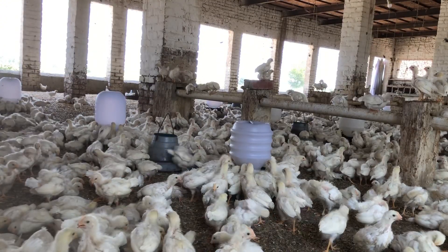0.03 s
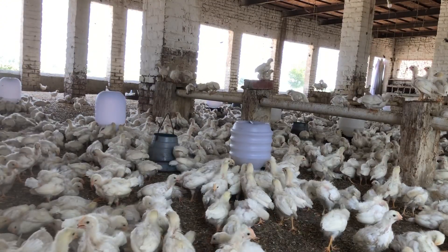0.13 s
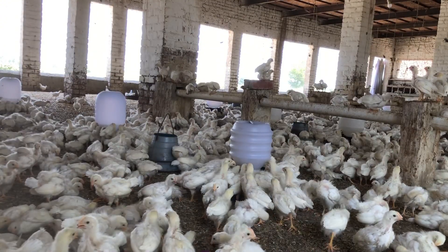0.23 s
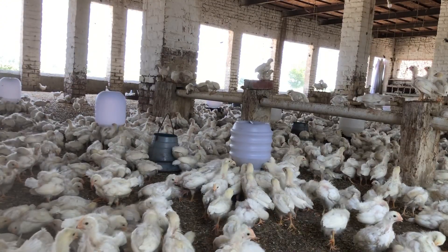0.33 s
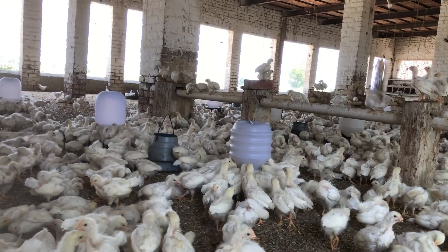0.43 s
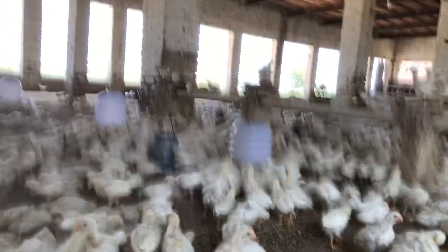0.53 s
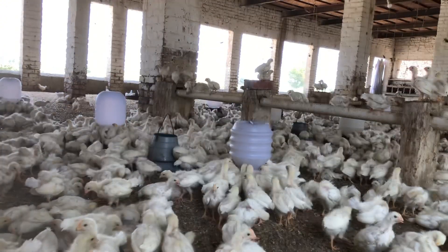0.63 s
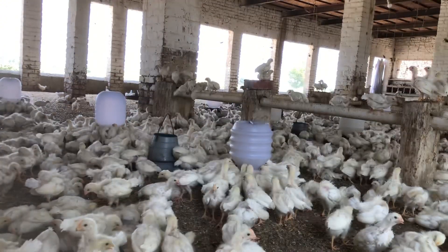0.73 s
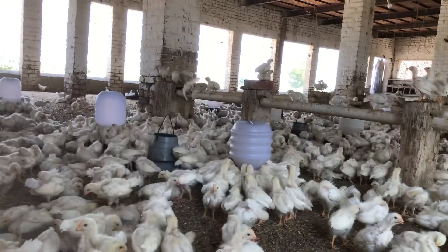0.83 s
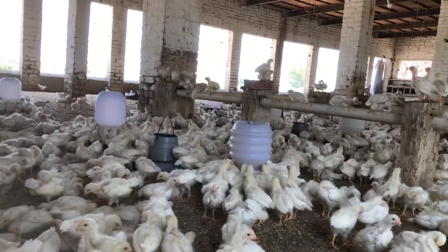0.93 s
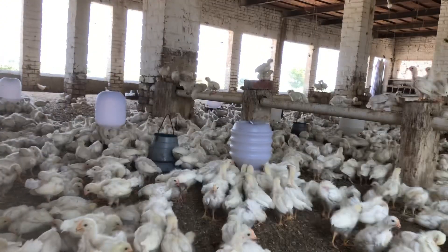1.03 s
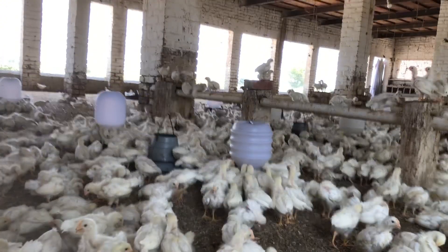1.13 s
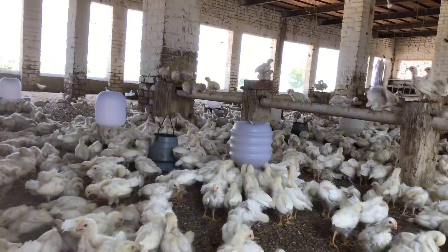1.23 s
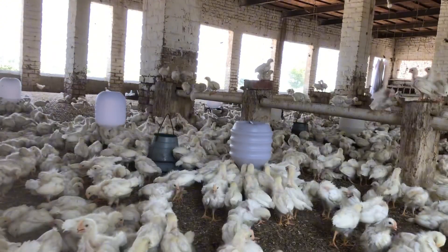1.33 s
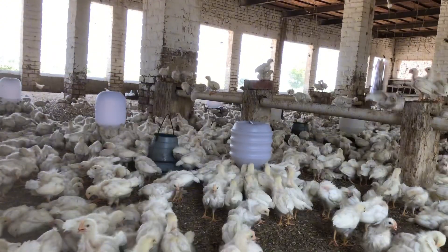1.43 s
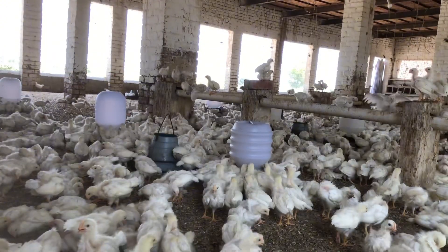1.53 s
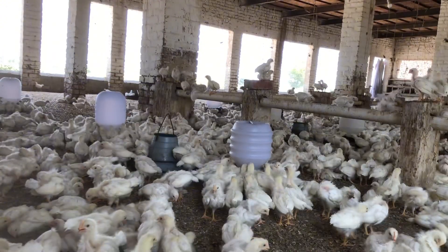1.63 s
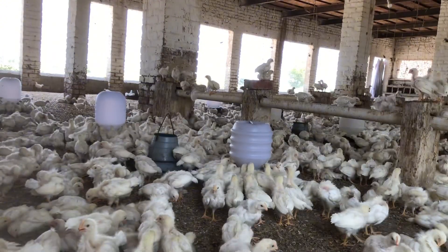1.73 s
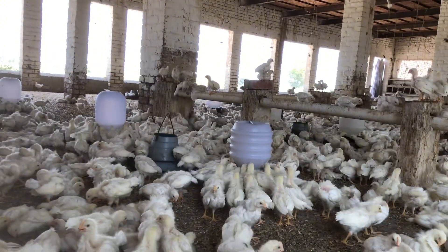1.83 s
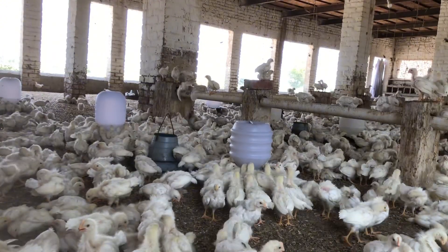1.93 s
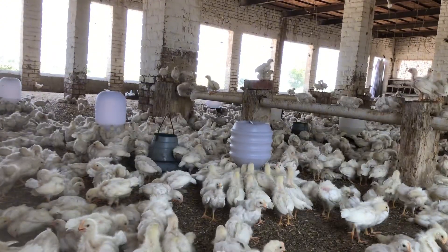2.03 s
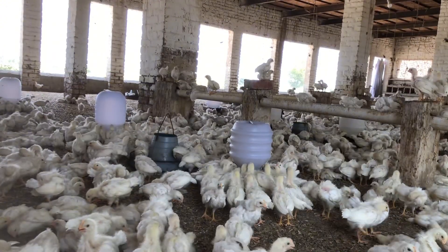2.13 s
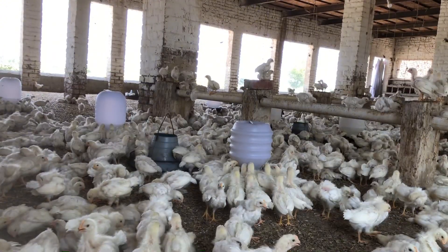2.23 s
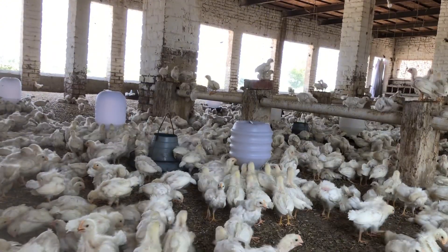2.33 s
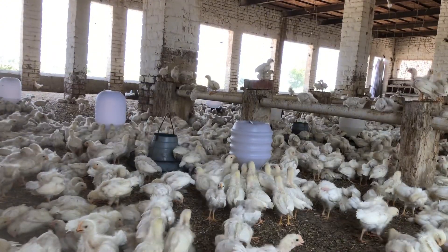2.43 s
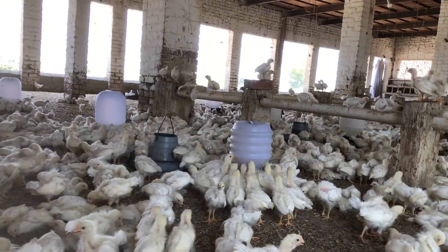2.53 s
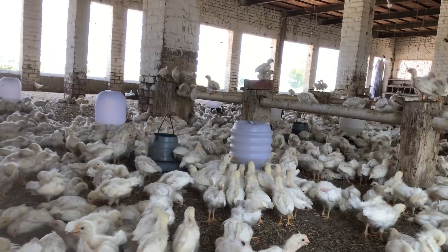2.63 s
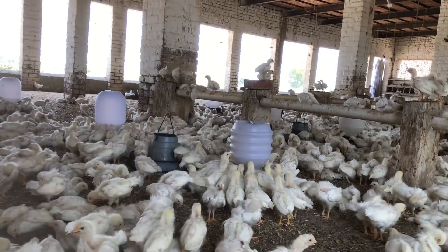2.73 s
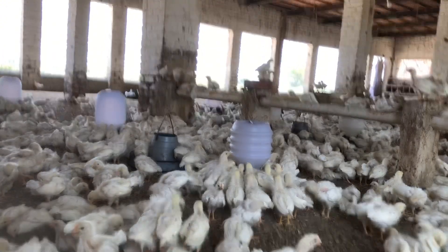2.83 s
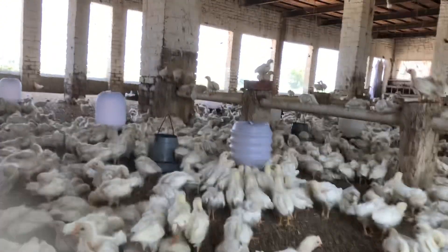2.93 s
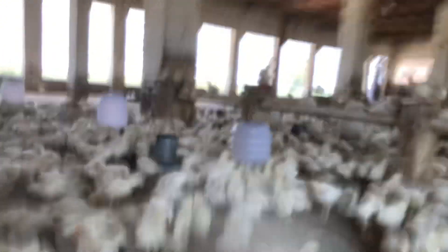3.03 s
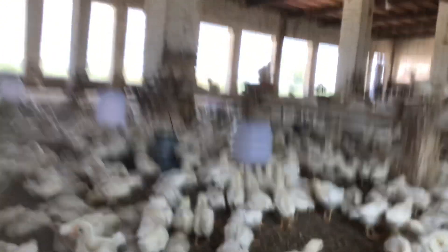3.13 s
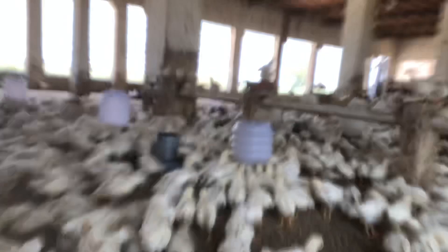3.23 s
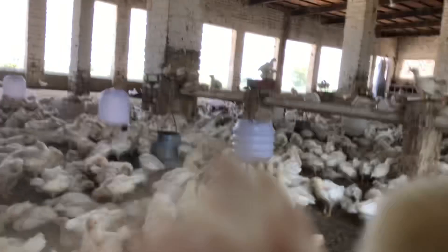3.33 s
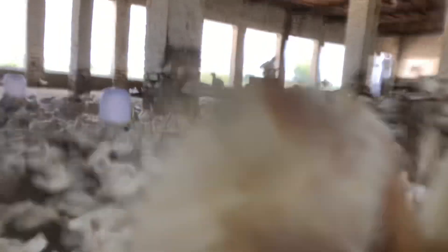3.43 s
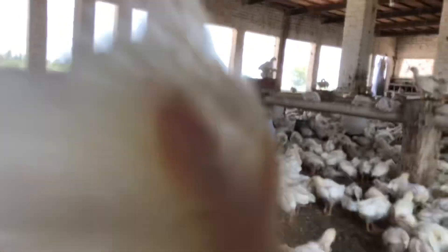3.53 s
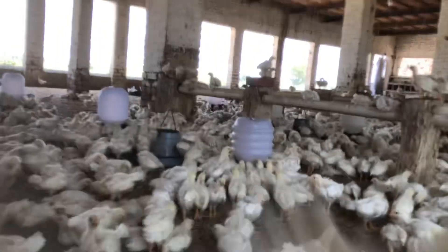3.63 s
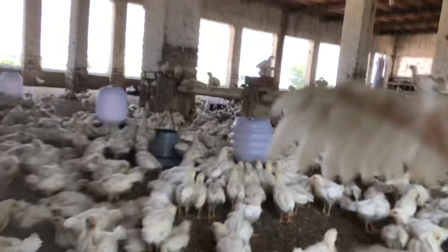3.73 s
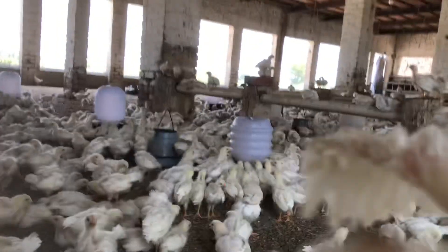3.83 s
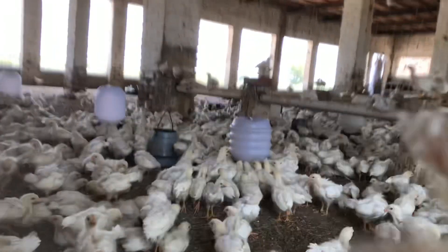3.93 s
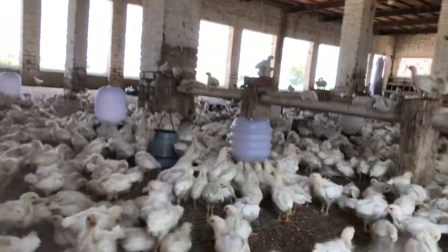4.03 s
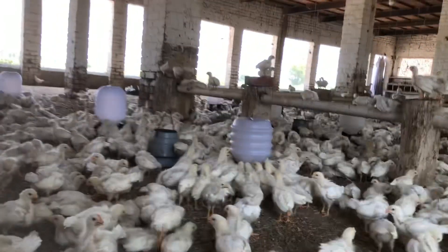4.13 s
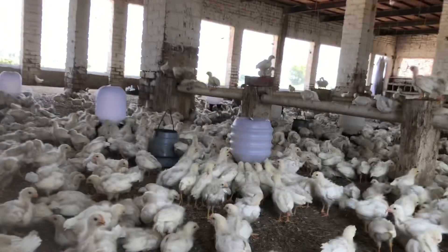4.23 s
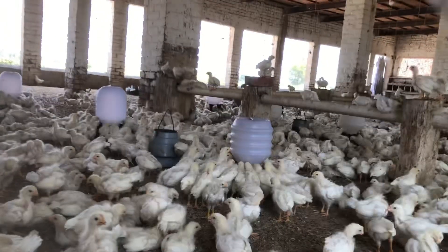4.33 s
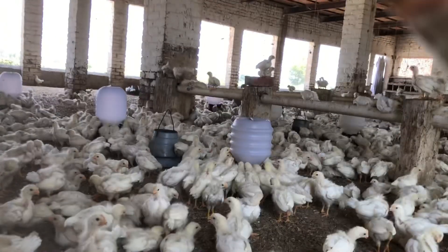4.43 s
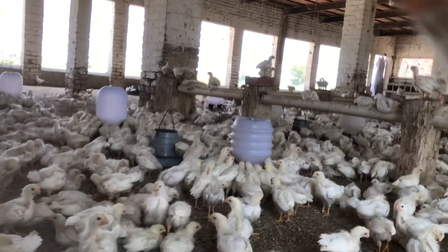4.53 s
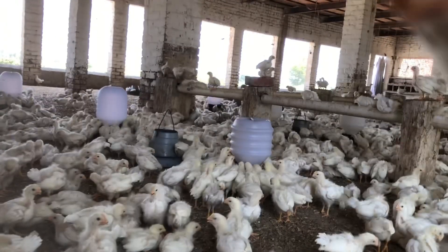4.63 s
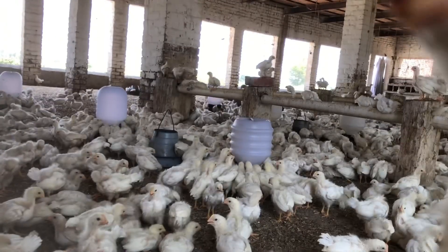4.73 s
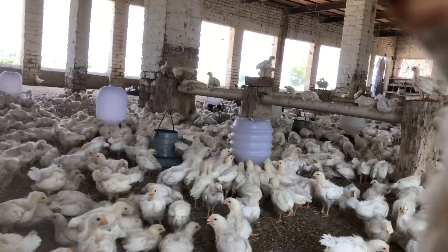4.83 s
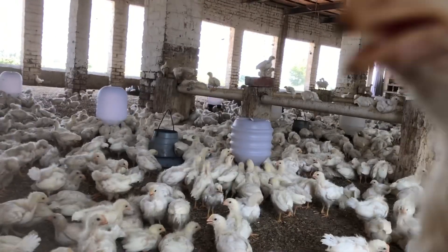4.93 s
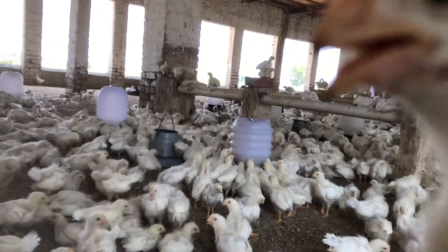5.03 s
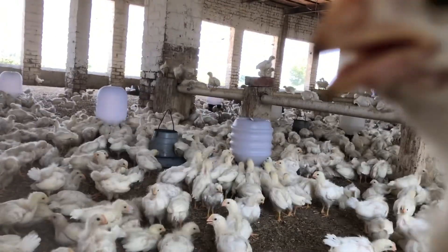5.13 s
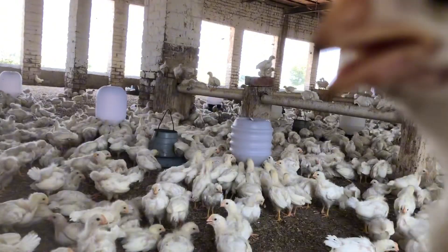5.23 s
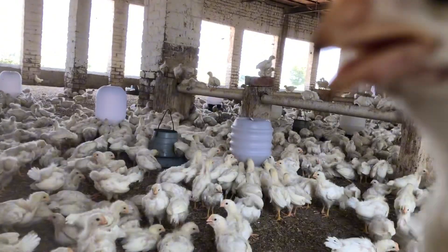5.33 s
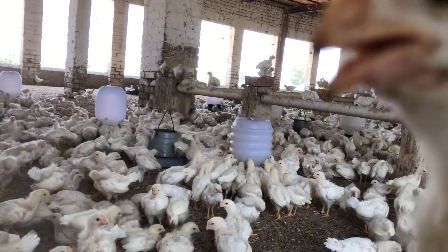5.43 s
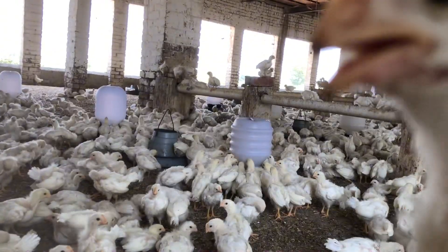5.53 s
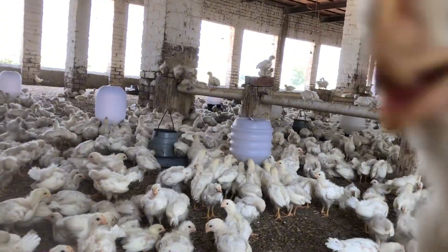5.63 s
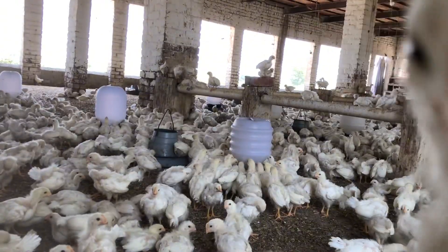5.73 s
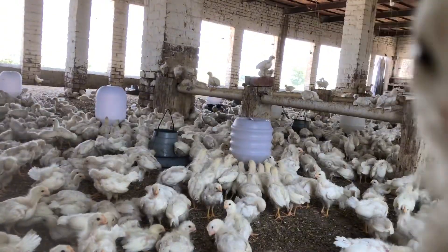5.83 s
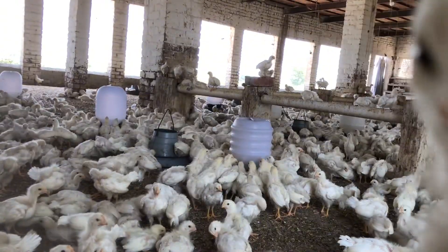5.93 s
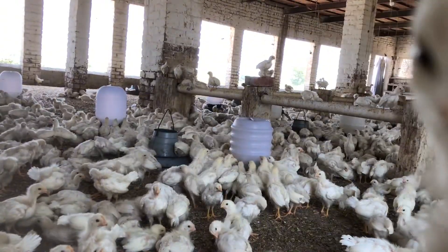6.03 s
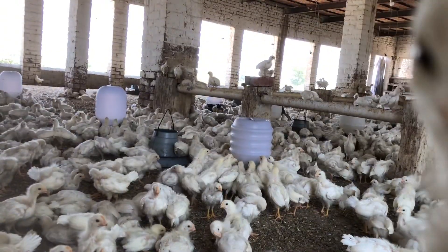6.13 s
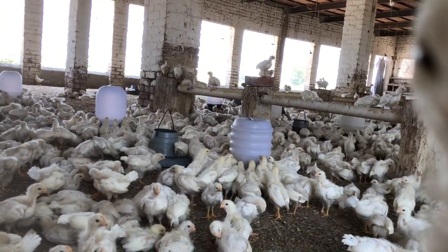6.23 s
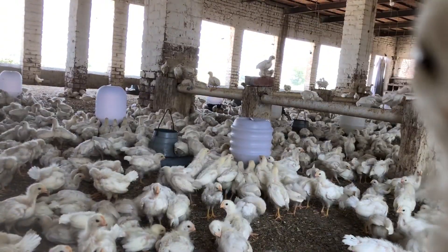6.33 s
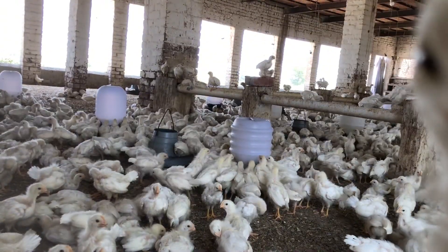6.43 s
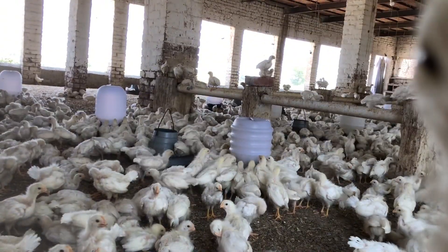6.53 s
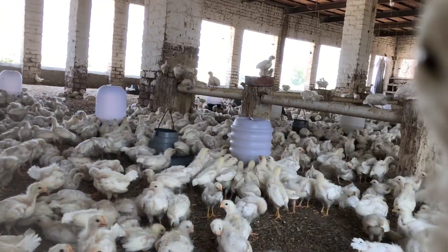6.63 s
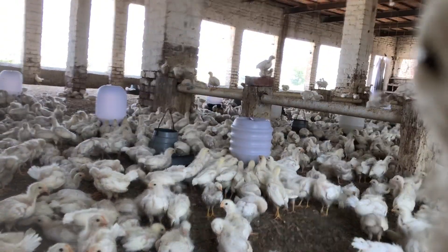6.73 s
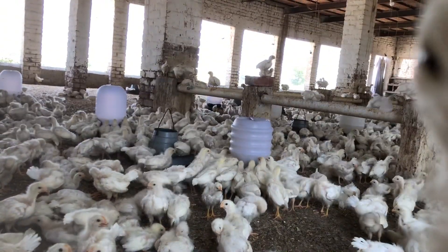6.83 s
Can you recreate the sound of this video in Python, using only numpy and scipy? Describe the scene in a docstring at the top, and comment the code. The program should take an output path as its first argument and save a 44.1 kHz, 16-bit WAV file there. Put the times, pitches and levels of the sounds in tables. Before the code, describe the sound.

Hundreds of young chickens peep steadily in an open brick shed over a soft murmur and faint motor hum. Small scuffs tick on the pole holding the microphone and a soft low coo sounds. Around three seconds a bird flaps up very close: heavy thumps, wing puffs, feather swishes and scrabbling claws until about four and a half seconds. Then quieter peeps, light taps and hoarse breathy calls.

```python
"""A flock of young chickens peeps and trills (gliding whistles) in an open shed, with its murmur (noise),
a faint far motor (steady tones) and breeze. Claws shuffle, scuff and knock on the pole that carries the
microphone; each knock travels along it as a falling bending wave. A soft low coo (sine) sounds before one
bird flaps up onto the pole; hoarse calls (breath noise) come before and after. Feathers brush the port
(grainy noise), wing beats buffet it, claws and beak scrabble, and a sliding foot makes the pole sing."""
import sys
import numpy as np
from scipy import signal
from scipy.fft import irfft
from scipy.io import wavfile

SR = 44100
rng = np.random.default_rng(int(sys.argv[2]) if len(sys.argv) > 2 else 0)


def transcribe(u):
    """Save the signal u as a 16-bit wav file named by the first command-line argument.

    u: samples, shape (n,) or (channels, n), limited to [-1, 1]; the rate is SR.
    q: integer samples, one column per channel.
    """
    v = np.clip(np.atleast_2d(u).T, -1, 1)
    q = np.round(v * 32767).astype(np.int16)
    wavfile.write(sys.argv[1], SR, q)


N = 304290

# ways the pole can ring: (pitch [Hz], relative level [dB], time to die by 60 dB when left free [s])
POLE_MODES = [(318, -0.5, 0.028), (492.4, 9, 0.032), (553, -1.5, 0.06), (675, 9.5, 0.0086),
              (995, -0.5, 0.032), (1705, 6, 0.0097)]
# how hard the bird works on the pole, as the level of its shuffling claws: (time [s], level [dB])
CLAW_WORK = [(0, -65.5), (2.82, -71.5), (2.95, -47), (3.2, -37), (3.39, -54.5), (3.58, -35.5),
             (3.72, -49.5), (4.12, -43.5), (4.36, -57.5), (4.563, -40.5), (4.66, -69), (5.1, -58.5),
             (6.45, -74), (6.9, -50.5)]


def from_db(db):
    """Gain of a level in dB."""
    return 10 ** (np.asarray(db) / 20)


def rms_one(x):
    """Scale to rms 1, a common loudness."""
    return x / np.sqrt(np.mean(x ** 2) + 1e-20)


def in_time(rows):
    """Columns of a curve table after its time column, one value per sample."""
    s, *columns = np.transpose(rows)
    return [np.interp(np.arange(N) / SR, s, column) for column in columns]


def add(track, s, sound):
    """Mix a short sound in at time s."""
    i = max(round(s * SR), 0)
    track[i:i + len(sound)] += sound[:N - i]


def drift(rate):
    """Slow random wandering of spread 1; a higher rate in Hz wanders faster."""
    r = np.exp(-80 * np.pi * rate / SR)   # worked out at every 40th sample only
    noise = rng.standard_normal(N // 40 + 2002)
    slow = signal.lfilter([1], [1, -2 * r, r * r], noise)[2000:]
    return np.interp(np.arange(N) / 40, np.arange(len(slow)), rms_one(slow))


def burst_db(s, hold_s, peak_db, rise_db_per_s, fall_db_per_s):
    """Level in dB that climbs to a peak at s, holds and falls away."""
    t = np.arange(N) / SR
    before, after = np.maximum(s - t, 0), np.maximum(t - s - hold_s, 0)
    return np.maximum(peak_db - rise_db_per_s * before - fall_db_per_s * after, -200)


def resonate(x, hz, width_hz):
    """One resonance, applied twice; gain 1 on top."""
    r = np.exp(-np.pi * width_hz / SR)
    section = [(1 - r * r) / 2, 0, (r * r - 1) / 2, 1, -2 * r * np.cos(2 * np.pi * hz / SR), r * r]
    return signal.sosfilt([section, section], x)


def banded_noise(spectrum, patchy_db):
    """Half-octave bands of noise, each with its own level and flicker; rms 1."""
    out, together, edges = 0, drift(2.3), 22 * 2 ** np.arange(0, 9.6, .5)
    white = rng.standard_normal((2, N))   # neighbouring bands take turns with two noises
    hz, db = np.transpose(spectrum)
    for k, (low, high) in enumerate(zip(edges, edges[1:])):
        level_db = np.interp(np.log(low * high) / 2, np.log(hz), db, -200, -200)
        if level_db > -150:   # bands outside the table stay silent
            band_filter = signal.butter(2, [low, high], "band", fs=SR, output="sos")
            band = signal.sosfilt(band_filter, white[k % 2])
            flicker_db = patchy_db * (0.15 * together + drift(29.0))
            out = out + from_db(level_db + flicker_db) * band
    return rms_one(out)


def shed_echo(x):
    """A dying noise tail stands for the many echoes of roof and pillars."""
    t60_s = .28   # time to die by 60 dB
    t = np.arange(round(.6 * SR)) / SR
    tail = rng.standard_normal(len(t)) * from_db(-60 * t / t60_s) * (t > .008)
    return signal.fftconvolve(x, tail / np.sqrt(np.sum(tail ** 2)))[:N]


def whistle(hz, peak_db, overtone_db):
    """A note of the bird's voice organ: a sine and its octave, swelling, fading and throbbing a little."""
    swell = np.sin(np.linspace(0, np.pi, len(hz))) ** .55
    knots = np.arange(0, len(hz) + 160, 160)
    throb = from_db(3 * np.interp(np.arange(len(hz)), knots, rng.standard_normal(len(knots))))
    phase = 2 * np.pi * np.cumsum(hz * throb ** .015) / SR   # pitch wavers with the effort
    tone = np.sin(phase) + from_db(overtone_db) * np.sin(2 * phase)
    return from_db(peak_db) * swell * throb * tone


def glide(length, start_hz, middle_hz, end_hz):
    """Pitch as a parabola through three points."""
    curve = np.polyfit([0, .5, 1], [start_hz, middle_hz, end_hz], 2)
    return np.polyval(curve, np.linspace(0, 1, round(length * SR)))


def overtone(hz):
    """Level of the octave, strongest where it meets the beak resonance and in steep, pressed peeps."""
    beak_hz, beak_width_hz, beak_db = 6300, 1100, -12.5
    steep_hz_per_s = 1200   # each such step of faster fall adds a dB
    fall_hz_per_s = (hz[0] - hz[-1]) * SR / len(hz)
    pressed_db = np.minimum(fall_hz_per_s / steep_hz_per_s, 16) - 8 + rng.normal(0, 2)
    return beak_db - 12 * ((2 * hz - beak_hz) / beak_width_hz) ** 2 + pressed_db


def peep(hz, peak_db):
    """A whistle whose octave swells as it passes the beak resonance."""
    return whistle(hz, peak_db, overtone(hz))


def far_chicks(chorus_db, count):
    """Hundreds of short peeps at random moments, arched or falling, in waves of loudness."""
    low_hz, span_hz = 2550, 1200   # peeps start within this range, most of them low
    # slowest and fastest fall of pitch: (slowest [Hz per s], fastest [Hz per s])
    fall_range = 5000, 17000
    out = np.zeros(N)
    for when, size, pitch, fall, loud, arch in rng.random((count, 6)):
        length, hz = .02 + .05 * size ** 1.7, low_hz + span_hz * pitch ** 1.7
        drop_hz = length * np.interp(fall, [0, 1], fall_range)
        path = glide(length, hz, hz - (.7 * arch - .05) * drop_hz, hz - drop_hz)
        add(out, when * N / SR, peep(path, 9 * loud))
    return from_db(chorus_db + 1.5 * drift(4)) * rms_one(out)


def hum():
    """Steady motor tones that waver a little and fade as the motor load drops."""
    # motor tones: (pitch [Hz], rms level at the start [dB])
    tones = [(75, -53), (118, -56), (147, -58), (295, -63)]
    t, out = np.arange(N) / SR, np.zeros(N)
    for hz, db in tones:
        level_db = db - 1.84 * t + 2.5 * drift(2)
        turn = .5 * drift(2)
        out += np.sqrt(2) * from_db(level_db) * np.sin(2 * np.pi * hz * t + turn)
    return out


def murmur():
    """The shed's steady background: noise with little flicker."""
    # tone colour of the shed: (pitch [Hz], relative level per Hz [dB])
    colour = [(100, -34), (160, -10.5), (500, -10), (1000, -9), (1900, -24.5), (3200, -27), (6300, -32),
              (11500, -35), (13500, -30), (16000, -40)]
    return from_db(-64) * banded_noise(colour, patchy_db=1.5)


def breeze(level_db):
    """Air tumbling over the port makes patchy low noise."""
    # tone colour of the gusts: (pitch [Hz], relative level per Hz [dB])
    colour = [(25, -33.5), (45, -18), (70, 0.5), (110, -6.5), (170, -12), (300, -17), (420, -53)]
    return from_db(level_db) * banded_noise(colour, patchy_db=4.5)


def near_chicks():
    """The peeps and trills that stand out: falling whistles, and whistles that warble up and down."""
    # peeps: (time [s], length [s], middle pitch [Hz], fall from start to end [Hz],
    # level before throbbing [dB])
    peep_list = [(0.01, 0.082, 3270, 600, -60), (0.016, 0.059, 2850, 710, -59),
                 (0.085, 0.057, 3300, 800, -65), (0.143, 0.051, 2246, 112, -62.5),
                 (0.246, 0.03, 2290, -280, -59.5), (0.189, 0.044, 3370, 360, -55),
                 (0.31, 0.057, 3070, 780, -62), (0.35, 0.023, 2395, 134, -53.5),
                 (0.72, 0.047, 2810, 262, -57), (0.771, 0.037, 3150, 327, -59),
                 (0.849, 0.11, 3220, 974, -58), (1.176, 0.075, 2350, 269, -65),
                 (1.282, 0.12, 3400, 598, -66), (1.296, 0.074, 2990, 470, -60.5),
                 (1.365, 0.095, 2860, 485, -60.5), (1.458, 0.039, 3500, 350, -65.5),
                 (1.462, 0.038, 2950, 825, -64), (1.657, 0.053, 3060, 804, -63),
                 (1.707, 0.072, 3400, 755, -61.5), (1.741, 0.021, 2860, 200, -61),
                 (1.988, 0.033, 2640, 401, -59.5), (2.009, 0.07, 3170, 173, -62),
                 (2.045, 0.049, 2805, 350, -58), (2.231, 0.042, 2960, 464, -55),
                 (2.47, 0.11, 2940, 876, -61), (2.633, 0.083, 2960, 976, -59), (2.67, 0.12, 3070, 707, -61),
                 (2.74, 0.038, 2340, 430, -58), (2.808, 0.064, 3170, 494, -61),
                 (3.312, 0.06, 3060, 816, -61.5), (3.639, 0.056, 2840, 320, -55.5),
                 (3.696, 0.032, 2790, 210, -55), (3.722, 0.045, 3330, 403, -62),
                 (3.804, 0.064, 3070, 370, -62), (3.865, 0.055, 2513, 230, -49.5),
                 (3.967, 0.046, 3300, 657, -65), (4.013, 0.072, 3570, 1880, -59),
                 (4.217, 0.078, 3530, 789.5, -57.5), (4.345, 0.04, 3260, 880, -60),
                 (4.592, 0.058, 3060, 1317, -54.5), (4.762, 0.043, 3120, 151, -62),
                 (4.785, 0.075, 3580, 485, -62.5), (4.809, 0.04, 2830, 417, -53.5),
                 (4.843, 0.014, 1820, 200, -53), (4.94, 0.0083, 2340, 290, -50),
                 (4.999, 0.037, 3230, 298, -58), (5.037, 0.037, 2830, 100, -55.5),
                 (5.124, 0.0098, 2200, 210, -47.5), (5.135, 0.098, 3320, 630, -60),
                 (5.15, 0.013, 2270, 170, -58), (5.166, 0.041, 1640, 100, -61),
                 (5.298, 0.062, 3290, 705, -67.5), (5.337, 0.049, 2390, 420, -63),
                 (5.597, 0.046, 2660, 100, -62), (5.653, 0.054, 3120, 1000, -65.5),
                 (5.873, 0.068, 3170, 399.5, -66.5), (6.111, 0.026, 3320, 940.5, -67),
                 (6.294, 0.056, 3550, 800, -73.5), (6.043, 0.037, 3180, 302, -65),
                 (6.204, 0.071, 3410, 950, -59.5), (6.572, 0.035, 3330, 364, -61.5),
                 (6.594, 0.025, 2620, 700, -57.5), (6.858, 0.046, 3360, 555, -56)]
    # trills: (time [s], length [s], pitch the warble swings around, before sagging [Hz], swing [Hz],
    # warbles [per s], level before fading and throbbing [dB], octave against the main tone [dB])
    trill_list = [(.354, .056, 3300, 350, 36, -67, 0), (3.41, .095, 3750, -700, 39, -60, -14),
                  (4.346, .052, 4150, -560, 30, -58, -8), (4.821, .13, 3500, 330, 34.5, -64, 3),
                  (5.036, .036, 3750, 300, 30, -60, -12), (5.81, .14, 3250, 130, 33, -72, 3),
                  (6.12, .1, 3880, 60, 42, -67, -15), (6.13, .09, 3400, 120, 42, -70, 0)]
    early_fall = 0.37   # share of a peep's fall that is done by its middle
    sag_hz_per_s, fade_db_per_s = 1800, 90   # a trill sinks and weakens as breath runs out
    out = np.zeros(N)
    for s, length, middle_hz, fall_hz, peak_db in peep_list:
        start_hz = middle_hz + early_fall * fall_hz
        end_hz = middle_hz - (1 - early_fall) * fall_hz
        add(out, s - .005, peep(glide(length, start_hz, middle_hz, end_hz), peak_db))
    for s, length, hz, swing_hz, rate, peak_db, overtone_db in trill_list:
        t = np.arange(round(length * SR)) / SR
        pitch = hz - sag_hz_per_s * t - swing_hz * np.cos(2 * np.pi * rate * t)
        level_db = peak_db - fade_db_per_s * t + 2.5 * drift(60)[:len(t)]
        add(out, s, whistle(pitch, level_db, overtone_db))
    return out


def pole_wave(soft, far, free, strengths_db):
    """A blow heard through the pole: the highs arrive first, then its modes ring; peak 1.

    far is the share of the pole travelled, free the share left of each mode's ringing time."""
    bending = 0.2544   # seconds a 1 Hz wave needs for the whole pole; falls with the root of frequency
    f = np.fft.rfftfreq(8192, 1 / SR) + 1
    modes = 0
    for (hz, db, t60), extra_db in zip(POLE_MODES, strengths_db):
        width_hz = np.log(1000) / np.pi / (free * t60)
        ring = 1j * f * hz / (hz ** 2 - f ** 2 + 1j * f * width_hz)
        modes = modes + from_db(db + extra_db) * ring / (10 * free)
    bass_cut = (1j * f / 240 / (1 + 1j * f / 240)) ** 3
    contact = bass_cut / (1 + 1j * f / 1100) ** (2 + 8.3 * np.clip(soft, 0, 1))   # soft blows are dull
    below = np.minimum(f, 4000)   # above this pitch all waves travel alike
    cycles = bending * np.clip(far, 0, 1) * (2 * np.sqrt(below) - below / np.sqrt(4000))
    travel = np.exp(-2j * np.pi * cycles)
    wave = irfft(contact * travel * (0.51 + modes))[:6000]
    return wave / np.max(np.abs(wave))


def scrabble(level_db, per_s):
    """Small uneven claw contacts come in clumps; light touches let the pole ring freely."""
    clumps = from_db(8 * drift(22))
    sizes = from_db(2.9 * np.minimum(rng.exponential(1, N), 4)) * rng.choice([-1, 1], N)
    clicks = sizes * (rng.random(N) < per_s * clumps / SR)
    touch = pole_wave(0.42, 0.382, 0.82, np.zeros(len(POLE_MODES)))
    return from_db(level_db) * rms_one(signal.fftconvolve(clicks, touch)[:N])


def scuffs():
    """A dragged foot is rough friction noise heard through the pole."""
    # a foot drags: (time of peak [s], peak level [dB])
    drags = [(0.548, -49), (0.597, -46), (1.155, -47.5), (1.185, -45.5), (1.499, -49.5), (3.395, -33),
             (3.565, -43), (3.595, -31), (5.41, -47.5), (5.821, -48.5), (6.526, -47), (6.571, -42.5),
             (6.686, -43)]
    rise_db_per_s, fall_db_per_s = 609, 410
    level = sum(from_db(burst_db(s, 0, db, rise_db_per_s, fall_db_per_s)) for s, db in drags)
    grit = from_db(3 * drift(90)) * rng.standard_normal(N)
    wave = pole_wave(.4, .4, .8, np.zeros(len(POLE_MODES)))
    return level * rms_one(signal.fftconvolve(grit, wave)[:N])


def knocks():
    """Each knock: a foot-damped pole wave from somewhere along it, a weaker toe, a tick through the air."""
    # knocks on the pole: (time [s], peak level [dB], softness [0-1], tick level [dB])
    knock_list = [(0.584, -30, 0.8, -79), (1.167, -32.5, 1, -70), (2.156, -30, 0.18, -77),
                  (2.873, -31, 0.94, -60), (2.91, -28.5, 1, -65), (3.016, -31.5, 0.04, -45),
                  (3.078, -4.5, 0.49, -24.5), (3.168, -31, 0.96, -50), (3.181, -20.5, 0.87, -52),
                  (3.241, -28, 0.26, -44), (3.302, -18.5, 0.29, -35.5), (3.458, -10, 0.28, -31.5),
                  (3.462, -8, 1, -70), (3.534, -21.5, 0.36, -45), (3.615, -17, 0.48, -36.5),
                  (3.665, -17, 1, -45), (3.701, -27, 0.5, -47), (3.783, -16.5, 0.41, -46),
                  (4.207, -5, 0.31, -87.5), (4.214, -14, 0.63, -37.5), (4.248, -27.5, 0.4, -55),
                  (4.296, -9, 1, -53), (4.445, -19.5, 0.45, -69), (4.501, -23, 0.4, -42),
                  (4.531, -1.5, 0.3, -20), (4.535, -9, 0.42, -34), (4.701, -39.5, 0.5, -73),
                  (4.794, -37.5, 0.33, -58), (4.861, -38, 0.2, -45), (4.877, -31.5, 0.78, -53),
                  (5.011, -24, 0.62, -70), (5.076, -36, 0.97, -60), (5.346, -31.5, 0.63, -80),
                  (5.538, -26, 0.8, -60), (6.754, -17.5, 0.71, -48), (6.765, -14, 0.34, -86)]
    out, ticks, t = np.zeros(N), np.zeros(N), np.arange(600) / SR
    chance = rng.normal(0, 4.5, (len(knock_list), len(POLE_MODES)))   # each blow stirs the modes anew
    toes = rng.random((len(knock_list), 3))
    for (s, peak_db, soft, tick_db), strengths_db, (place, late, size) in zip(knock_list, chance, toes):
        blow = pole_wave(soft, 0.365 + 0.252 * place, 0.37 + 0.8 * late, strengths_db)
        add(out, s - .0012, from_db(peak_db) * blow)
        toe = 0.3 * (2 * size - 1) * pole_wave(soft + 0.18, 0.423, 0.56, strengths_db[::-1])
        add(out, s + 0.00499 + 0.00692 * late, from_db(peak_db) * toe)
        tick = rng.standard_normal(600) * np.exp(-t / 0.00094)
        add(ticks, s - .001, from_db(tick_db) * tick)
    tick_band = signal.butter(1, [3000, 7500], "band", fs=SR, output="sos")
    return out + signal.sosfilt(tick_band, ticks)


def hoarse_call():
    """Breath noise, chopped by the throat, in one resonance."""
    # breathy calls: (time [s], hold [s], pitch [Hz], width [Hz], level [dB])
    calls = [(1.46, 0.11, 2110, 120, -70), (5.212, 0.22, 1480, 330, -63.5), (5.805, 0.02, 1130, 350, -56.5)]
    rise_db_per_s, fall_db_per_s = 500, 121
    breath, out = from_db(2 * drift(40)) * rng.standard_normal(N), np.zeros(N)
    for s, hold_s, hz, width_hz, db in calls:
        level_db = burst_db(s, hold_s, db, rise_db_per_s, fall_db_per_s)
        out += from_db(level_db) * rms_one(resonate(breath, hz, width_hz))
    return out


def coo():
    """One soft low note, unsteady in breath and pitch, that sags at the end."""
    start_s, length_s, level_db = 1.72, 0.365, -58
    pitch_hz, sag_hz = 386, 35
    share = np.linspace(0, 1, round(length_s * SR))
    out, shake = np.zeros(N), drift(12)[:len(share)]
    hz = pitch_hz - sag_hz * share ** 3 + 3 * shake[::-1]
    swell = from_db(level_db + 1.5 * shake) * np.sin(np.pi * share) ** 0.5
    add(out, start_s, swell * np.sin(2 * np.pi * np.cumsum(hz) / SR))
    return out


def feathers():
    """Grainy noise: single brushes, and a swish that follows the bird's effort while the wings are open."""
    # feathers brush past the port: (time [s], peak level [dB])
    brush_list = [(2.2438, -51), (2.9637, -51), (3.0455, -51), (3.0736, -37.5), (3.1584, -51),
                  (3.3887, -42), (3.4945, -50), (3.5503, -46.5), (3.5922, -51), (3.6142, -50),
                  (3.9536, -52.5), (4.296, -58)]
    # resonances of the swish: (pitch [Hz], width [Hz], relative level [dB])
    swish = [(2000, 1000, -4.5), (6200, 1500, -6), (10500, 4500, -4), (14500, 3000, -10.5)]
    open_from_s, open_for_s, open_db, edge_db_per_s = 2.92, 1.66, -66.5, 298
    follows = 0.14   # dB of swish per dB of claw work
    fade_db_per_s = 2.5   # the swish weakens as the bird settles
    rise_db_per_s, fall_db_per_s = 2500, 607.5   # of a brush
    crest_db = 11.5   # allowance for grains that stand above the average level
    effort_db = in_time(CLAW_WORK)[0] - np.max(np.array(CLAW_WORK)[:, 1])
    flapping_db = burst_db(open_from_s, open_for_s, open_db, edge_db_per_s, edge_db_per_s)
    flapping_db += follows * effort_db
    flapping_db -= fade_db_per_s * np.maximum(np.arange(N) / SR - open_from_s, 0)
    brushes = sum(from_db(burst_db(s, 0.0011, db - crest_db, rise_db_per_s, fall_db_per_s))
                  for s, db in brush_list)
    barbs = np.zeros(N)
    for hz, width_hz, db in swish:
        rustle = rms_one(resonate(rng.standard_normal(N), hz, width_hz))
        barbs += from_db(db + 4.7 * drift(55)) * rustle
    return (from_db(flapping_db) + brushes) * from_db(1.7 * drift(160)) * barbs


def wing_puffs():
    """Each beat pushes a lump of air at the port: a short low swing of pressure with gliding pitch."""
    # wing beats on the port: (time [s], peak level [dB])
    beats = [(2.918, -28), (3.009, -25.5), (3.097, -14.5), (3.17, -27), (3.257, -27), (3.34, -32.5),
             (3.416, -30.5), (3.546, -26), (3.636, -19.5), (3.823, -34), (4.129, -34), (4.55, -38.5),
             (5.047, -34)]
    out, t = np.zeros(N), np.arange(-1800, 1800) / SR
    for (s, peak_db), (pitch, turn) in zip(beats, rng.random((len(beats), 2))):
        cycles = (56 + 36 * pitch) * t - (1400 * pitch - 300) * t ** 2 + turn   # most glide down
        add(out, s + t[0], from_db(peak_db) * np.exp(-(t / .015) ** 2) * np.cos(2 * np.pi * cycles))
    return out


def rubbing():
    """A gripping foot slides: friction noise in uneven slips drives the two longest-ringing modes."""
    # slides: (time [s], hold [s], level of longest-ringing mode [dB], level of the next [dB])
    slides = [(3.815, 0.027, -52, -51), (3.89, 0.15, -54.5, -59), (4.09, 0.023, -39, -54),
              (4.614, 0.51, -66.5, -68)]
    edge_db_per_s = 491
    longest = sorted(POLE_MODES, key=lambda mode: -mode[2])[:2]
    out = 0
    for k, (hz, db, t60) in enumerate(longest):
        level = sum(from_db(burst_db(s, hold_s, dbs[k], edge_db_per_s, edge_db_per_s))
                    for s, hold_s, *dbs in slides)
        width_hz = np.log(1000) / np.pi / t60 * 2
        singing = rms_one(resonate(rng.standard_normal(N), hz, width_hz))
        out = out + level * from_db(2.0 * drift(18)) * singing
    return out


def scene():
    """All sources at the one microphone."""
    # the shed at large: (time [s], far chorus level before mixing [dB], breeze level on the port [dB])
    flock = [(0, -64, -50), (1.2, -67, -53), (2.8, -64, -53), (3.0, -62.5, -33.5), (4.2, -73, -50),
             (4.4, -71, -65), (5.2, -73, -53.5), (6.9, -70.5, -56)]
    chorus_db, breeze_db = in_time(flock)
    far = far_chicks(chorus_db, count=480)
    near = near_chicks() + hoarse_call() + coo()
    air = near + from_db(-11) * shed_echo(near) + .62 * far + .45 * shed_echo(far)
    wind = breeze(breeze_db) + wing_puffs()
    pole = scrabble(in_time(CLAW_WORK)[0], per_s=230) + scuffs() + knocks() + rubbing()
    return (air + hum() + murmur() + wind + pole + feathers())[None]


def record(dry):
    """The capsule drops the deepest bass and the highest treble, peaks are rounded, the top is cut."""
    cutoff_hz = 15900
    thin = signal.sosfilt(signal.butter(2, [34, 12500], "band", fs=SR, output="sos"), dry)
    rounded = 0.8 * np.tanh(thin / 0.8)
    return signal.sosfilt(signal.cheby2(12, 45, cutoff_hz, fs=SR, output="sos"), rounded)


dry = scene()
out = record(dry)
transcribe(out)
```